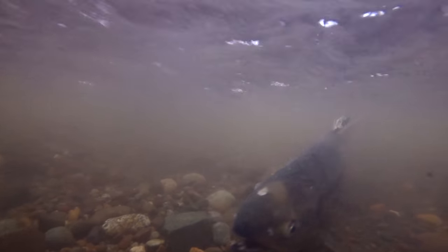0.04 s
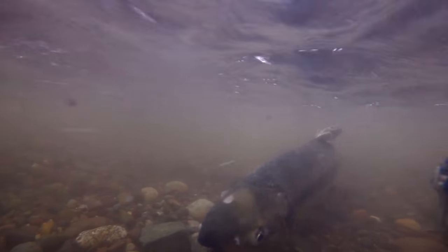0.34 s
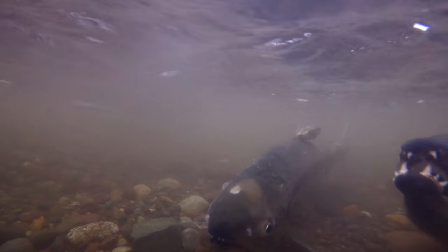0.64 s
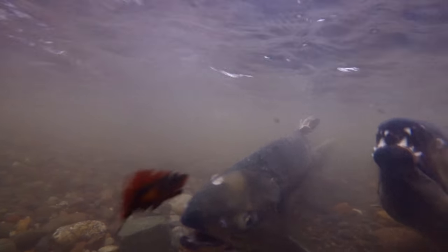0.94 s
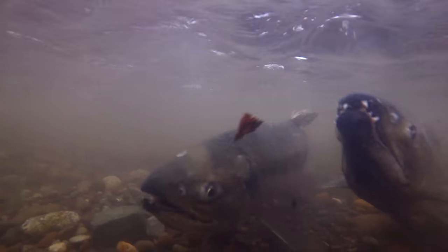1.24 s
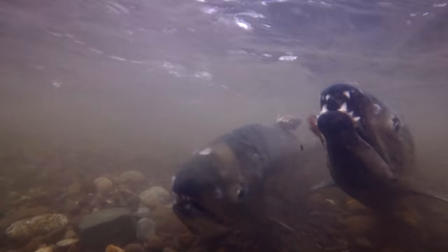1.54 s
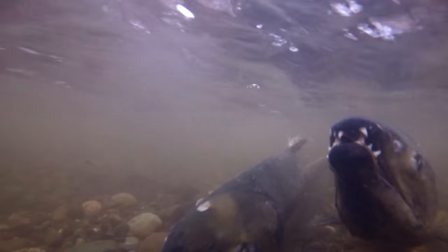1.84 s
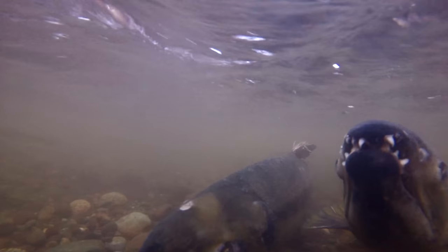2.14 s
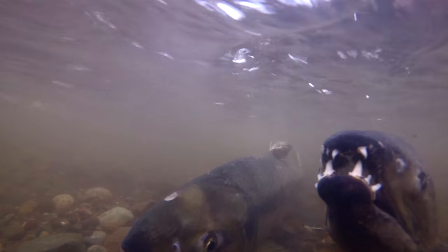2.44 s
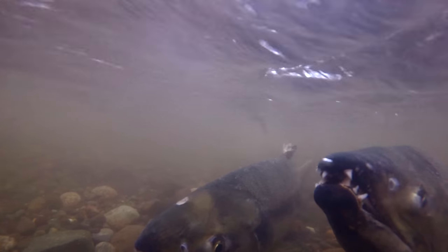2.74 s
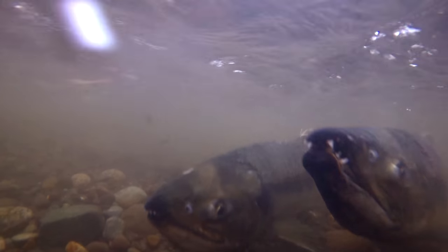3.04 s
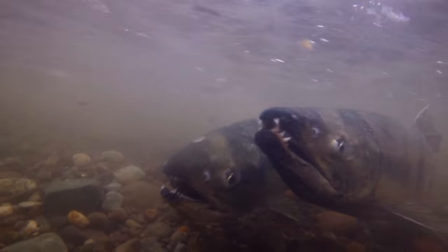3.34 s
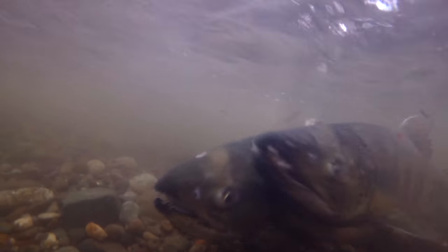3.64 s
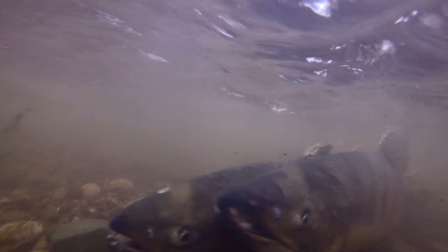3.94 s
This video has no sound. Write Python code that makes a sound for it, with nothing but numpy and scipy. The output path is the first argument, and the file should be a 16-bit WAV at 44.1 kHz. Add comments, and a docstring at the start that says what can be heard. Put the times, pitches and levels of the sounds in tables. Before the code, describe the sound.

Water bubbles and rumbles around a microphone submerged in a shallow stream, with soft gravel rustle throughout. Short, muffled bubble blips and hollow pebble knocks crowd the first second, loudest at about 0.6 seconds. They thin out, leaving rumble and low thumps until 2 seconds. A clear plop comes near 2.4, knocks and pops around 3, and a loud cluster at 3.5 to 3.7 seconds.

```python
"""Air bubbles pinch off and ring close to a camera lying under water in a shallow stream.
Each bubble is a short tone that fades, most often rising in pitch. Pebbles and debris knock
on the camera's housing and make it ring, and sand grains and tiny bubbles tick. The current
rumbles on the housing, and gravel rustles past over a faint gurgle, fizz and distant wash.
The loudest bubbles and knocks overload the microphone."""
import sys
import numpy as np
from scipy import signal
from scipy.fft import rfft, irfft
from scipy.io import wavfile
from scipy.ndimage import uniform_filter1d

SR = 44100
rng = np.random.default_rng(int(sys.argv[2]) if len(sys.argv) > 2 else 0)


def dump(signal):
    """Clip the signal to [-1, 1] and save it as 16-bit WAV at the path in sys.argv[1]."""
    limited = np.clip(np.atleast_2d(signal).T, -1, 1)
    pcm = np.round(limited * 32767).astype(np.int16)
    wavfile.write(sys.argv[1], SR, pcm)


N = 176400  # 4 seconds

# Nearby bubbles, and a few longer ringing tones of the housing:
# start_s, level_db, pitch_hz, decay_s, rise_per_s (share of the pitch; below 0 it falls)
BUBBLES = [(.008, -21.5, 712, 0.042, 0.5), (0.036, -20, 1463, 0.0072, -3.5), (.112, -14.5, 713.4, 0.035, 0),
           (.168, -16.5, 715, 0.037, -1.5), (.236, -16, 830, 0.011, 4.5), (.265, -5.5, 823, 0.007, -1.5),
           (0.277, -2, 852, 0.0097, 0), (0.314, -4.5, 886, 0.0071, -3), (0.374, -21.5, 919, 0.022, -6.5),
           (.419, -3.5, 812.3, 0.0074, 9.5), (.474, -17, 937, 0.022, -2.5), (0.6341, 13, 498, 0.0043, 29.5),
           (0.6414, 7, 586, 0.0034, 24), (.652, -27.5, 649, 0.038, 3), (.697, -16, 648, 0.027, 1),
           (0.7567, 3, 852, 0.011, 6), (.800, -17.5, 1104, 0.024, -1), (0.8313, 2.5, 885, 0.0093, 2),
           (0.832, -27.5, 1774, 0.01, -1.5), (1.215, -25, 511, 0.025, -0.5), (1.735, -14, 658, 0.022, 2.5),
           (2.082, -6.5, 850, 0.0037, 11), (2.155, -21, 925, 0.012, 2), (2.180, -37.5, 1513, 0.037, -3.5),
           (2.376, 4.5, 743, 0.014, 3), (2.383, -19.5, 1110, 0.016, 0.5), (2.464, -6, 631, 0.0091, 1.5),
           (2.69, -18.5, 910, 0.0064, 4.5), (2.719, -21.5, 1580, 0.006, 0), (2.822, -13.5, 1130, 0.006, -6),
           (2.822, -27.5, 1370, 0.0096, 1), (3.085, -29.5, 1610, 0.0051, -2), (3.119, 5.5, 313, 0.0038, 7),
           (3.118, -17, 1507, 0.0025, 3), (3.132, -23.5, 1410, 0.0047, 14.5), (3.187, -10, 610, 0.0071, 2),
           (3.439, 4, 648, 0.0045, 6.5), (3.488, 0.5, 1094, 0.0023, 0), (3.493, -4.5, 1630, 0.0022, 6),
           (3.514, 2.5, 245, 0.006, -1), (3.519, 9.5, 697, 0.0029, 2), (3.71, -8.5, 1226, 0.0028, 3),
           (3.847, -30.5, 1050, 0.011, 2), (3.862, -32.5, 1350, 0.011, 2)]
# Pebbles and debris hitting the housing: start_s, level_db, pitch_hz, decay_s, crack_db (added to level)
KNOCKS = [(.025, -13, 681, 0.018, -7.5), (.038, -16.5, 673, 0.0068, -37.5), (.086, -10, 629, 0.0079, -15),
          (.098, -11, 701, 0.018, -24.5), (.126, -15.5, 692, 0.0074, -8), (.257, 0.5, 633, 0.0016, -20.5),
          (0.31, -10.5, 604, 0.0058, -6.5), (0.404, 4, 688, 0.0045, -14), (.434, 5.5, 587, 0.0015, -25.5),
          (0.455, -3.5, 565, 0.0076, -7.5), (0.633, -5.5, 316, 0.0045, 0),
          (0.801, -6.5, 890, 0.0095, -21.5), (.894, -23, 614, 0.015, -11), (1.035, -14.5, 633, 0.011, -16),
          (1.055, -17, 567, 0.012, -26.5), (1.429, -15, 568, 0.008, -9), (1.566, -28, 587, 0.012, -0.5),
          (1.712, -13.5, 674, 0.014, -23.5), (1.995, -21.5, 622, 0.0082, -41),
          (2.077, -5, 600, 0.0024, -16), (2.137, -8, 630, 0.0045, -12.5), (2.253, -40, 650, 0.0039, 11.5),
          (2.307, -14.5, 575, 0.0075, -16.5), (2.558, -21, 718, 0.014, -2.5),
          (2.689, -18, 656, 0.0057, -19), (2.717, -11, 734, 0.0027, -35), (2.955, 4, 682, 0.0037, -13),
          (3.037, -16.5, 598, 0.0043, -20), (3.063, -21.5, 765, 0.0021, -1.5),
          (3.117, -13.5, 387, 0.0021, -4.5), (3.169, -8.5, 336, 0.011, -37), (3.168, -8, 712, 0.0035, -15),
          (3.452, -11.5, 745, 0.0069, -10), (3.468, -3.5, 773, 0.0035, -35),
          (3.475, -0.5, 313, 0.0032, -33), (3.489, -4, 723, 0.0067, -8), (3.513, 2.5, 570, 0.0068, -9.5),
          (3.322, -31, 617, 0.0028, -12), (3.661, -27.5, 663, 0.0088, -7.5), (3.711, -1, 639, 0.0047, -19),
          (3.713, -1.5, 253, 0.0029, -35.5), (3.848, -16.5, 723, 0.0051, -12.5),
          (3.892, -22, 668.5, 0.028, -23)]
# Tone colour of a knock's crack: frequency_hz, gain_db
CRACK_COLOUR = [(150, 0), (400, 10.5), (900, 8), (1600, 0.5), (2100, -20), (2500, -37), (3100, -40.5),
                (4400, -46), (6000, -66), (12000, -96)]
# Tones the housing rings with: pitch_hz, level_db, ring_s (time to fade by 60 dB)
HOUSING_TONES = [(248.4, -14, 0.14), (348.9, -18.5, 0.23), (573, -6.5, 0.088), (719.4, -9.5, 0.13),
                 (1260, -33, 0.04), (1570, -35, 0.057)]
# Pings of sand grains and tiny bubbles: start_s, level_db (before TICK_BOOST_DB), pitch_hz
TICKS = [(.126, -52, 3720), (.127, -43.5, 2025), (0.258, -48, 4260), (.3122, -43.5, 3670),
         (0.4527, -36, 3810), (1.208, -52, 4400), (1.339, -40.5, 1710), (1.430, -56, 2100),
         (1.431, -50, 4480), (1.456, -49, 2150), (2.077, -36, 2080), (2.137, -42.5, 2550),
         (2.956, -17.5, 1850), (2.9547, -34, 2520), (3.138, -40, 1900)]
# Strength of the current on the housing: time_s, level_db
CURRENT_LEVEL = [(0, -18), (.5, -24.5), (.7, -25.5), (.9, -19.5), (.97, -21), (1.3, -17.5), (1.58, -21),
                 (1.7, -14), (1.85, -14), (1.97, -21.5), (2.13, -21), (2.55, -16.5), (2.95, -18),
                 (3.27, -15), (3.4, -17.5), (3.57, -19.5), (3.7, -19), (4, -11.5)]
# Tone colour of the current's rumble: frequency_hz, gain_db
RUMBLE_COLOUR = [(8, -31), (20, 1.5), (40, 4), (62, -4.5), (100, -7), (135, -22.5), (200, -23.5),
                 (300, -31.5), (600, -90), (3000, -120)]
# Low thumps on the housing, from swirls of water and the push of loud hits:
# peak_s, level_db, pitch_hz, half_length_s
THUMPS = [(0.636, -2.5, 170, 0.0014), (0.96, -8, 29.5, 0.023), (1.426, -13, 48, 0.023),
          (1.612, -12, 59.5, 0.019), (1.686, -2.5, 28.8, 0.015), (1.825, -11, 61.4, 0.011),
          (1.849, -14.5, 165, .01), (2.133, -7, 43.5, 0.014), (2.687, -11.5, 45.8, .013),
          (3.042, -7, 47, 0.016), (3.13, -5.5, 70, 0.0085), (3.276, -6.5, 55, .013),
          (3.474, -25.5, 138, 0.024), (3.519, -9, 196.4, 0.01), (3.635, -11.5, 62.3, 0.024),
          (3.7191, -0.5, 43, 0.004), (3.881, -16, 51.8, 0.012)]
# Loudness of the gravel's rustle: time_s, level_db
RUSTLE_LEVEL = [(0, -30.5), (.18, -31), (.35, -29.5), (.47, -28.5), (.66, -33.5), (.93, -34.5),
                (1.03, -25.5), (1.12, -40), (1.25, -33.5), (1.53, -32.5), (1.74, -25.5), (1.92, -47.5),
                (2.25, -33.5), (2.54, -25.5), (2.8, -36), (3.2, -28), (3.3, -35.5), (3.47, -24),
                (3.6, -44.5), (3.79, -40.5), (3.87, -25), (4, -41)]
# Tone colour of the gravel heard through the housing: frequency_hz, gain_db
RUSTLE_COLOUR = [(100, -34.5), (180, 5), (238, 0.5), (290, -23), (342, 7), (440, -14), (570, 4.5),
                 (630, -3), (705, 2.5), (800, -9.5), (960, -20), (1550, -26), (2000, -49), (3000, -57),
                 (9000, -90)]
# Tone colour of distant water rushing over stones: frequency_hz, gain_db
WASH_COLOUR = [(150, 15.5), (700, 0.5), (1000, -3.5), (1600, -8), (1950, -26.5), (2200, -23.5), (2500, -39),
               (3600, -40.5), (6000, -43), (15000, -54)]
# Loudness of the thin fizz: time_s, level_db
FIZZ_LEVEL = [(0, -79.5), (.7, -80.5), (1.05, -75), (1.3, -67), (1.9, -80), (2.5, -74), (3.15, -71),
              (3.55, -77.5), (4, -79.5)]

BUBBLE_ATTACK_S, BUBBLE_TO_HOUSING_DB = 0.0016, -16.5
BUBBLE_FLUTTER_DB, BUBBLE_FLUTTER_S = 1.29, 0.0085
GLIDE_LIMIT = 0.49  # a pitch slides by at most this share
THUD_ATTACK_S, KNOCK_TO_HOUSING_DB = 0.00051, -12.5
CRACK_ATTACK_S, CRACK_DECAY_S = 0.00027, 0.0046
TICK_DECAY_S, TICK_BOOST_DB = 0.0026, 10
GRAINS_PER_S, GRAIN_SPREAD_DB, RUSTLE_HISS_GAIN = 540, 3.5, 0.92
CLUMP_DB, CLUMP_S = 5, 0.0077
WASH_DB, WALL_CUTOFF_HZ = -44.5, 1800
GURGLE_DB, GURGLE_PER_S, GURGLE_SPREAD_DB = -48.5, 17, 5
GURGLE_LOW_HZ, GURGLE_HIGH_HZ, GURGLE_DB_PER_OCTAVE, GURGLE_DECAY_CYCLES = 506, 2070, -14, 5.4
FIZZ_PER_S, FIZZ_SPREAD_DB, FIZZ_HZ, FIZZ_PITCH_SCATTER, FIZZ_DECAY_S = 550, 4.5, 4440, 0.043, 0.002
LIMIT_DB, LIMIT_SHARE, RECOVER_DB_PER_S = 2.5, 0.17, 70.5
CLIP_HARDNESS, TREBLE_EDGE_HZ = 260, 15800


def bubbles():
    """Bubbles ring unevenly and shake the housing; a few longer tones are the housing's own."""
    tones, housing = np.zeros(N), np.zeros(N)
    for start_s, db, hz, decay_s, rise_per_s in BUBBLES:
        add(tones, start_s, amp(db) * ring(hz, decay_s, BUBBLE_ATTACK_S, rise_per_s))
        add(housing, start_s, amp(db + BUBBLE_TO_HOUSING_DB) * housing_ring())
    wobble = amp(BUBBLE_FLUTTER_DB * flutter(BUBBLE_FLUTTER_S))
    return through_wall(tones * wobble + housing)


def knocks():
    """A pebble's hit gives a thud that the water soon stops, a short crack and a ringing housing."""
    thuds, cracks = np.zeros(N), np.zeros(N)
    t = np.arange(SR // 20) / SR
    crack_shape = (1 - np.exp(-t / CRACK_ATTACK_S)) * np.exp(-t / CRACK_DECAY_S)
    for start_s, db, hz, decay_s, crack_db in KNOCKS:
        add(thuds, start_s, amp(db) * ring(hz, decay_s, THUD_ATTACK_S))
        add(thuds, start_s, amp(db + KNOCK_TO_HOUSING_DB) * housing_ring())
        add(cracks, start_s, amp(db + crack_db) * crack_shape * rng.standard_normal(len(t)))
    filter_gain = colour(rng.standard_normal(N), CRACK_COLOUR).std()
    return through_wall(thuds) + colour(cracks, CRACK_COLOUR) / filter_gain


def housing_ring():
    """The housing rings on after one blow, a little differently each time."""
    t = np.arange(SR // 3) / SR
    tones = sum(amp(db - 60 * t / ring_s) * rng.uniform(.7, 1.3) * np.sin(2 * np.pi * hz * t)
                for hz, db, ring_s in HOUSING_TONES)
    return tones * (1 - np.exp(-t * 1000))  # fades in over about 1 ms


def ticks():
    """Sand grains and tiny bubbles give short, high pings."""
    out = np.zeros(N)
    for start_s, db, hz in TICKS:
        add(out, start_s, amp(db + TICK_BOOST_DB) * ring(hz, TICK_DECAY_S, BUBBLE_ATTACK_S))
    return out


def current():
    """Flowing water rumbles on the housing; swirls and the push of loud hits add low thumps."""
    rumble = colour(rng.standard_normal(N), RUMBLE_COLOUR)
    strength = np.sqrt(uniform_filter1d(rumble ** 2, size=SR // 10))
    out = level(CURRENT_LEVEL) * rumble / strength  # dividing evens out chance swells
    for peak_s, db, hz, half_length_s in THUMPS:
        t = np.arange(N) / SR - peak_s
        out -= amp(db) * np.exp(-(t / half_length_s) ** 2) * np.cos(2 * np.pi * hz * t)
    return out


def gravel():
    """Gravel rustles past in clumps: clicks and hiss, heard through the housing."""
    clumps = amp(CLUMP_DB * flutter(CLUMP_S))
    grains = patter(GRAINS_PER_S, GRAIN_SPREAD_DB) + RUSTLE_HISS_GAIN * rng.standard_normal(N)
    return level(RUSTLE_LEVEL) * unit(colour(clumps * grains, RUSTLE_COLOUR))


def wash():
    """Far away, shallow water rushes steadily over stones."""
    return amp(WASH_DB) * unit(colour(rng.standard_normal(N), WASH_COLOUR))


def gurgle():
    """Small bubbles of 20 sizes pop further off, the high ones fainter."""
    out = np.zeros(N)
    for hz in np.geomspace(GURGLE_LOW_HZ, GURGLE_HIGH_HZ, num=20):
        gain = amp(GURGLE_DB_PER_OCTAVE * np.log2(hz / GURGLE_LOW_HZ))
        pop = gain * ring(hz, GURGLE_DECAY_CYCLES / hz, BUBBLE_ATTACK_S, rise_per_s=7.9)
        clicks = patter(GURGLE_PER_S / 20, GURGLE_SPREAD_DB)
        out += signal.oaconvolve(clicks, pop)[:N]  # every click becomes a pop
    return amp(GURGLE_DB) * unit(through_wall(out))


def fizz():
    """The tiniest bubbles make a stream of faint, high pings."""
    pings = np.zeros(N)
    for hz in FIZZ_HZ * (1 + FIZZ_PITCH_SCATTER * rng.standard_normal(20)):
        clicks = patter(FIZZ_PER_S / 20, FIZZ_SPREAD_DB)
        pings += signal.oaconvolve(clicks, ring(hz, FIZZ_DECAY_S, BUBBLE_ATTACK_S))[:N]
    return level(FIZZ_LEVEL) * unit(pings)


def through_wall(x):
    """The wall of the housing dulls sound coming from the water."""
    return signal.sosfilt(signal.butter(6, WALL_CUTOFF_HZ, fs=SR, output="sos"), x)


def ring(hz, decay_s, attack_s, rise_per_s=0):
    """A fading tone whose pitch can slide up or down and then level off."""
    t = np.arange(SR // 4) / SR
    pitch_hz = hz * (1 + GLIDE_LIMIT * np.tanh(rise_per_s * t / GLIDE_LIMIT))
    shape = (1 - np.exp(-t / attack_s)) * np.exp(-t / decay_s)
    return shape * np.sin(2 * np.pi * np.cumsum(pitch_hz) / SR)


def patter(per_s, spread_db):
    """Clicks of uneven size at random times."""
    sizes = amp(spread_db * np.minimum(rng.exponential(1, N), 4))
    signs = rng.choice([-1, 1], N)
    hits = rng.random(N) < per_s / SR
    return unit(sizes * signs * hits)


def flutter(span_s):
    """A smooth random wobble that changes over about span_s."""
    return unit(signal.oaconvolve(rng.standard_normal(N), np.hanning(int(2 * span_s * SR)), "same"))


def colour(x, points):
    """Makes each frequency louder or softer, following (frequency_hz, gain_db) points."""
    hz, db = np.transpose(points)
    all_hz = abs(np.fft.fftfreq(N, 1 / SR)) + 1
    log_gain = np.log(amp(np.interp(np.log(all_hz), np.log(hz), db)))
    response = np.exp(np.conj(signal.hilbert(log_gain)))  # rings after a click, not before it
    return irfft(rfft(x) * response[:N // 2 + 1], N)


def amp(db):
    """Turns decibels into a number to multiply by."""
    return 10 ** (np.asarray(db) / 20)


def unit(x):
    """Scales a signal to an average strength (rms) of 1."""
    return x / np.sqrt(np.mean(x ** 2) + 1e-20)


def level(points):
    """A volume curve through (time_s, level_db) points."""
    return amp(np.interp(np.arange(N) / SR, *np.transpose(points)))


def add(mix, start_s, sound):
    """Lays a sound into the mix at start_s."""
    part = mix[max(round(start_s * SR), 0):][:len(sound)]
    part += sound[:len(part)]


def scene():
    """Everything that reaches the underwater microphone, in one channel."""
    background = current() + gravel() + wash() + gurgle() + fizz()
    return (bubbles() + knocks() + ticks() + background)[None]


def record(dry):
    """The camera turns down after loud blows, clips the peaks and cuts the highest treble."""
    smoothing = [1 / 400], [1, 1 / 400 - 1]  # averages over about 9 ms
    power_db = 10 * np.log10(signal.lfilter(*smoothing, dry[0] ** 2) + 1e-12)
    recovery_db = np.arange(N) * RECOVER_DB_PER_S / SR
    held_db = np.maximum.accumulate(power_db + recovery_db) - recovery_db  # jumps up, sinks slowly
    over_db = np.maximum(held_db - LIMIT_DB, 0)
    limited = dry / amp(LIMIT_SHARE * signal.lfilter(*smoothing, over_db))
    clipped = limited / (1 + abs(limited) ** CLIP_HARDNESS) ** (1 / CLIP_HARDNESS)
    treble_cut = signal.firwin(255, TREBLE_EDGE_HZ, window=("kaiser", 9), fs=SR)
    return signal.oaconvolve(clipped, treble_cut[None], "same")


dry = scene()
out = record(dry)
dump(out)
```